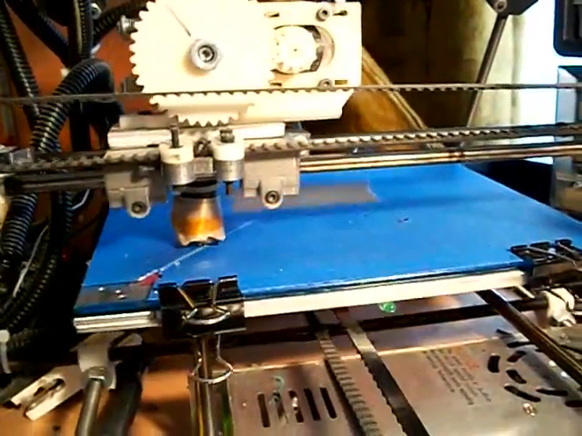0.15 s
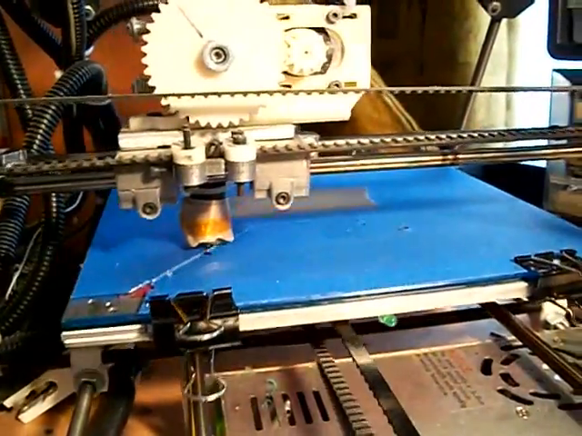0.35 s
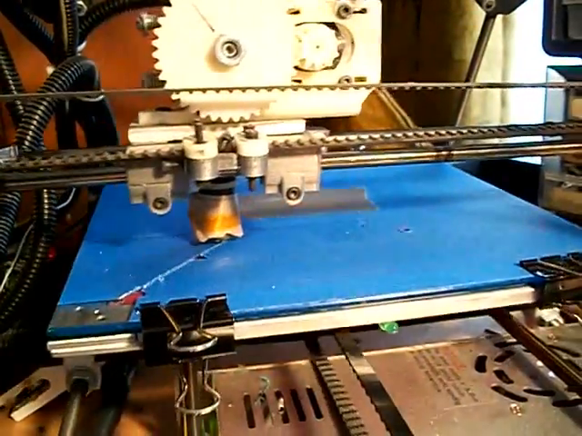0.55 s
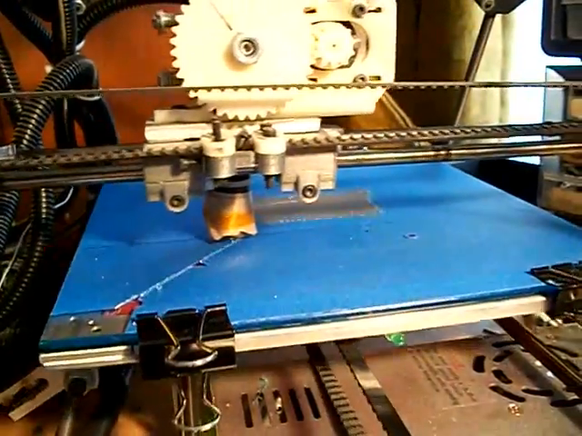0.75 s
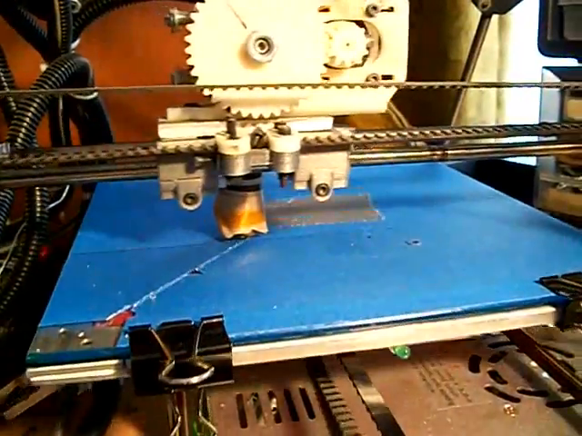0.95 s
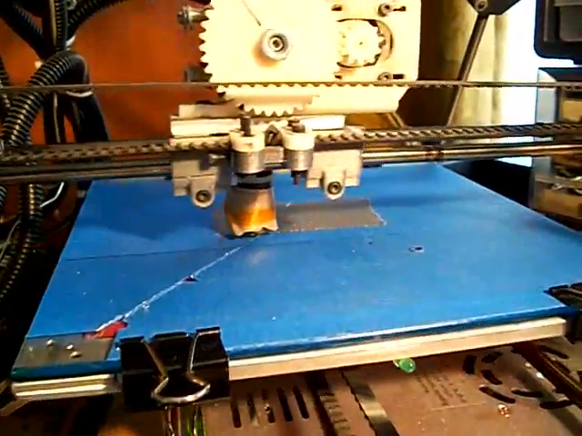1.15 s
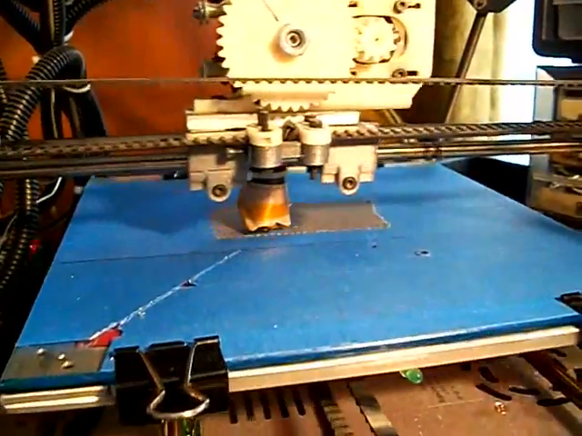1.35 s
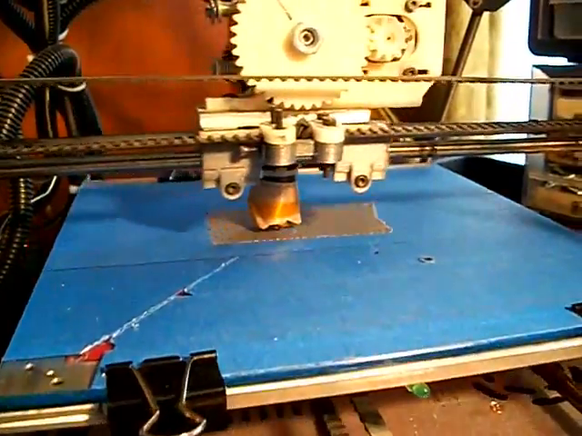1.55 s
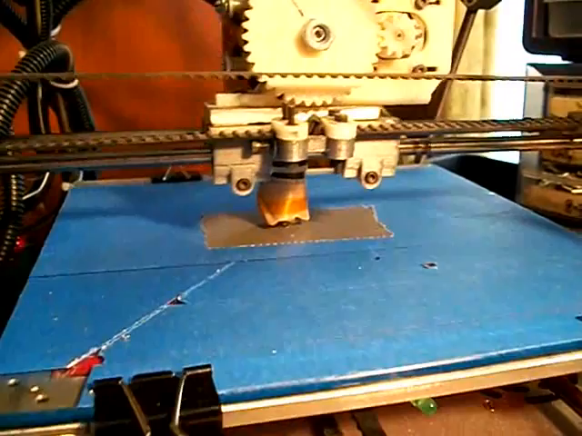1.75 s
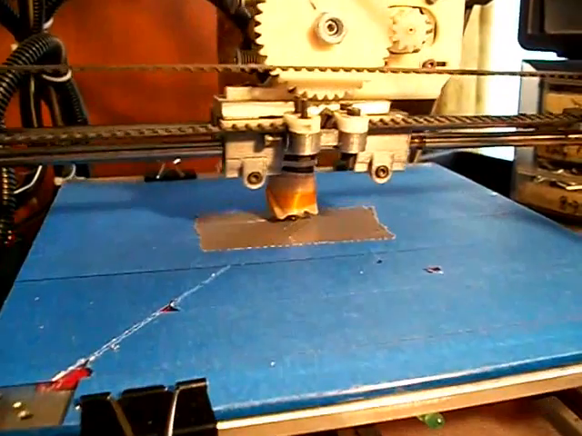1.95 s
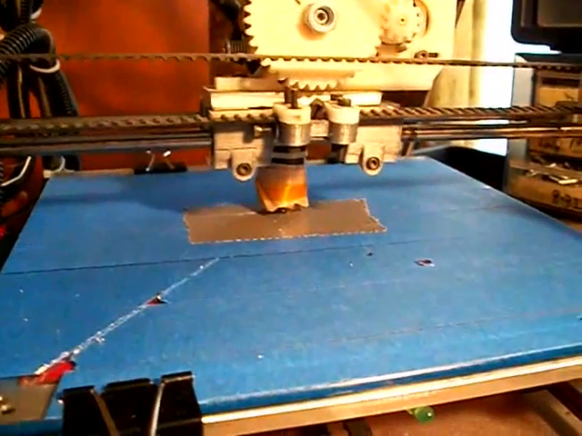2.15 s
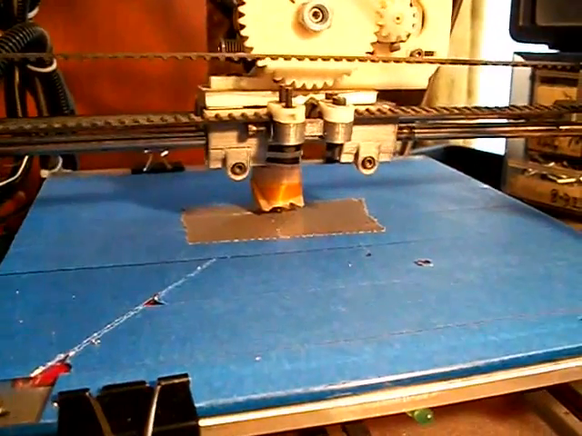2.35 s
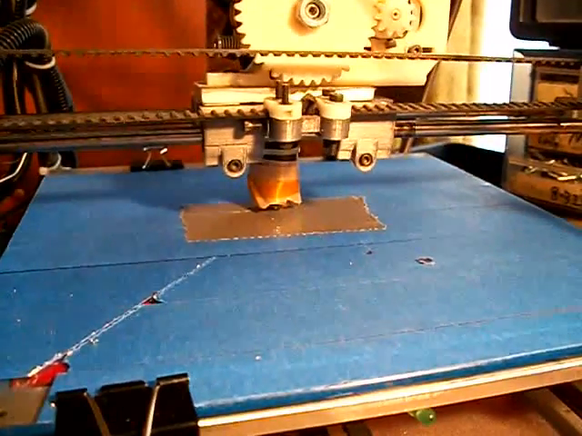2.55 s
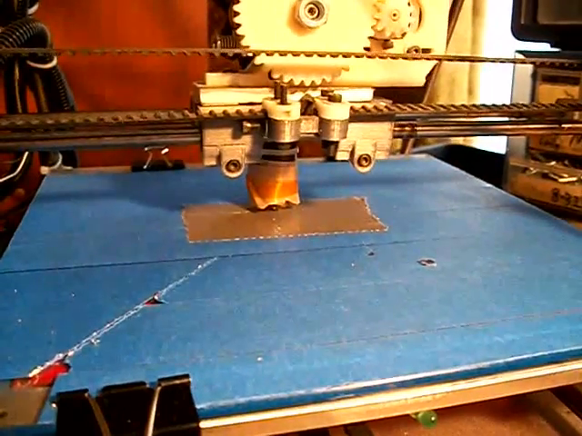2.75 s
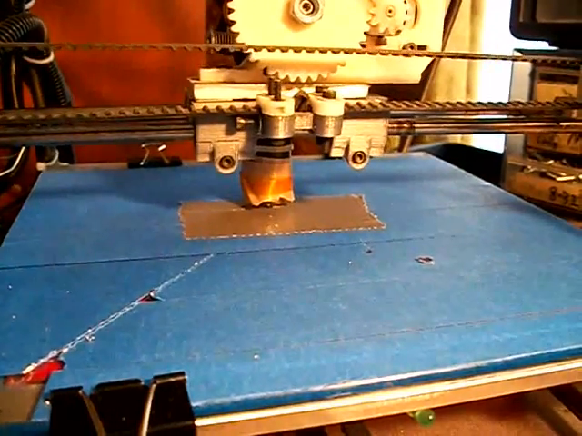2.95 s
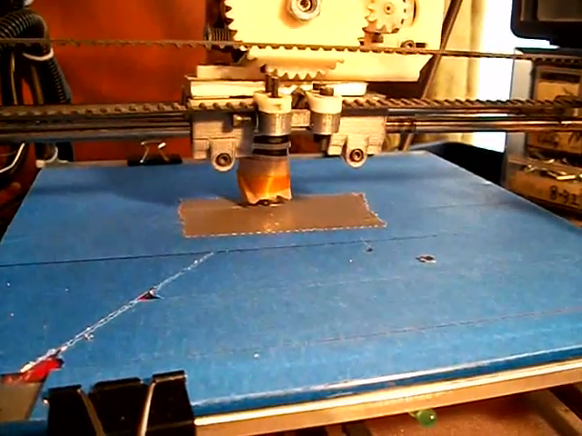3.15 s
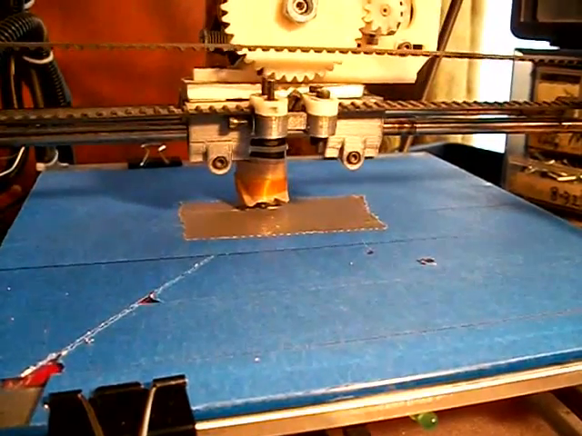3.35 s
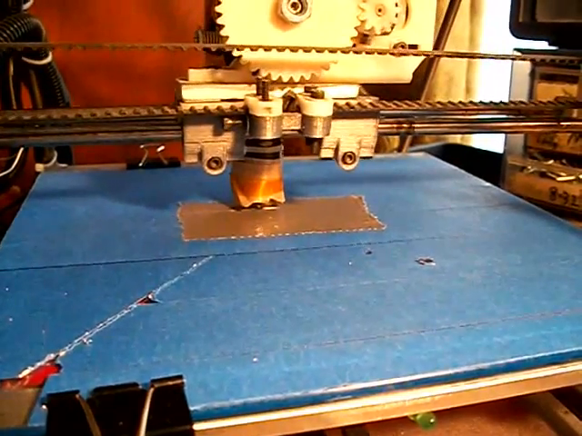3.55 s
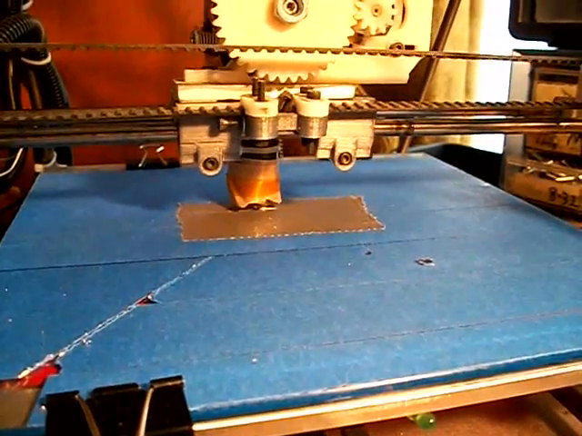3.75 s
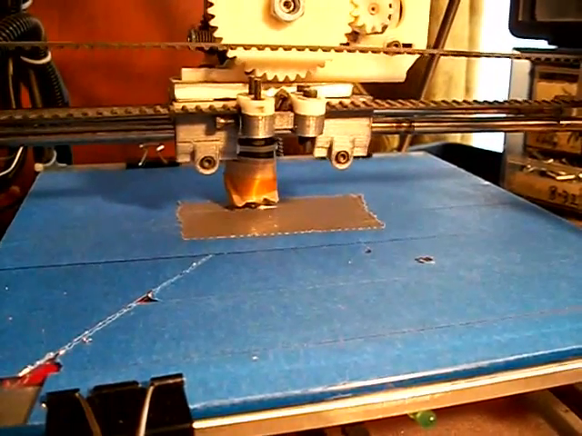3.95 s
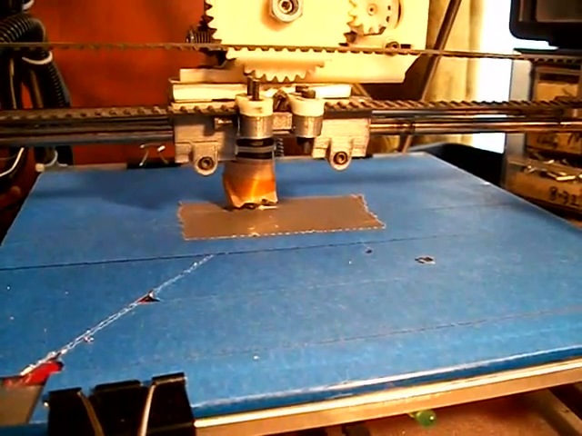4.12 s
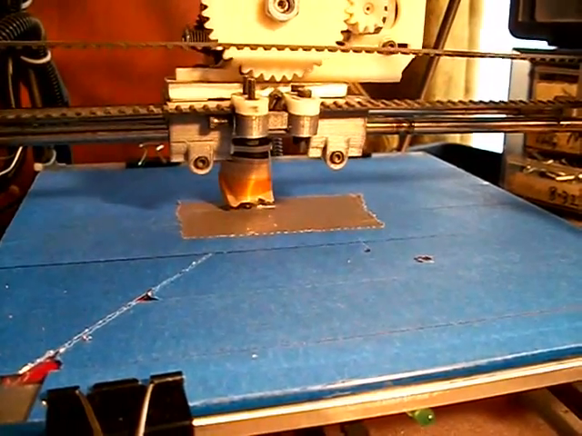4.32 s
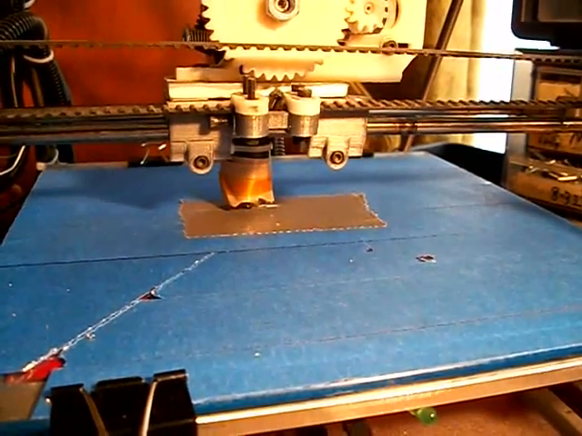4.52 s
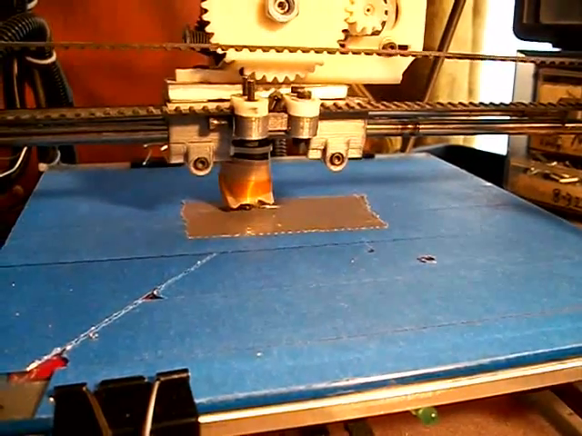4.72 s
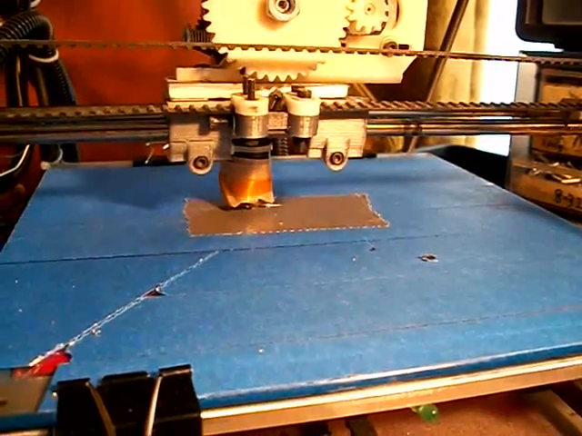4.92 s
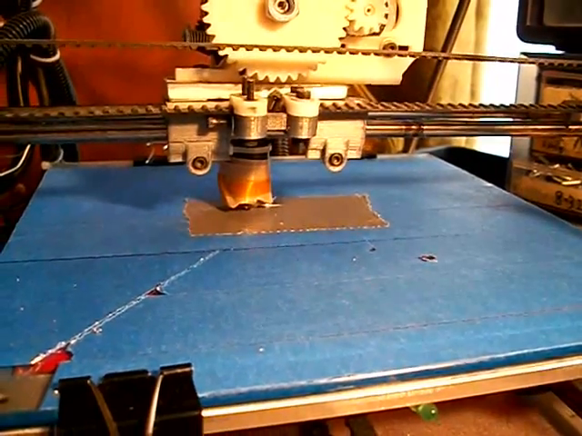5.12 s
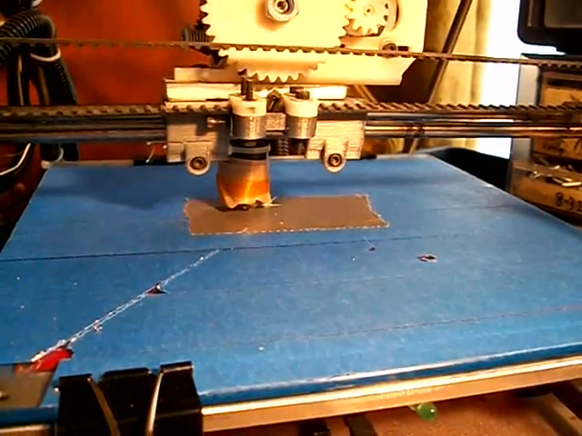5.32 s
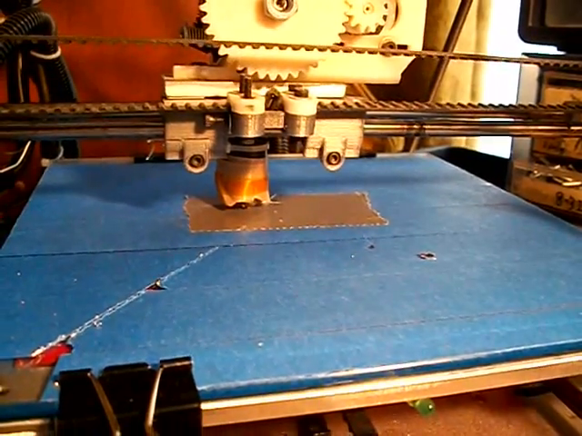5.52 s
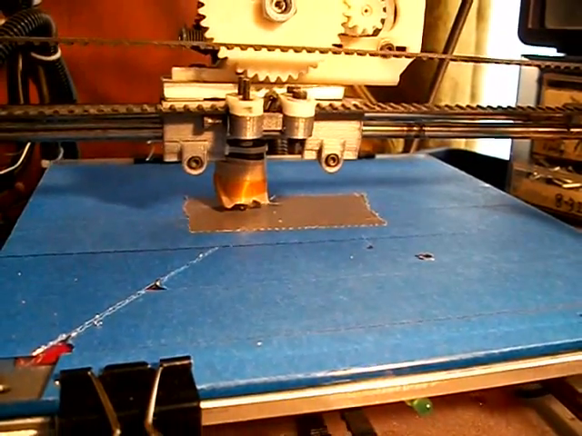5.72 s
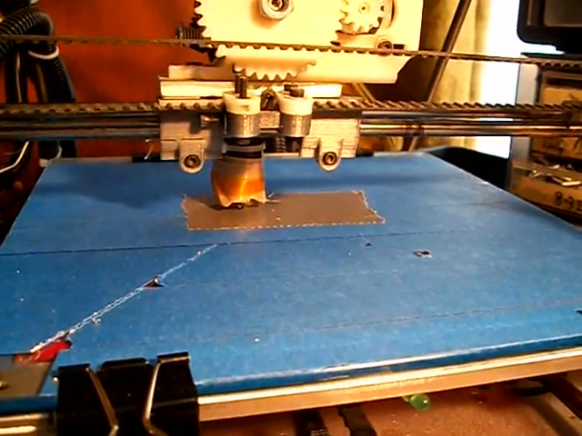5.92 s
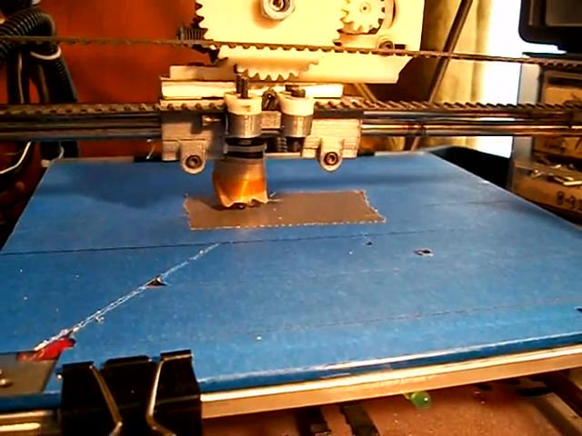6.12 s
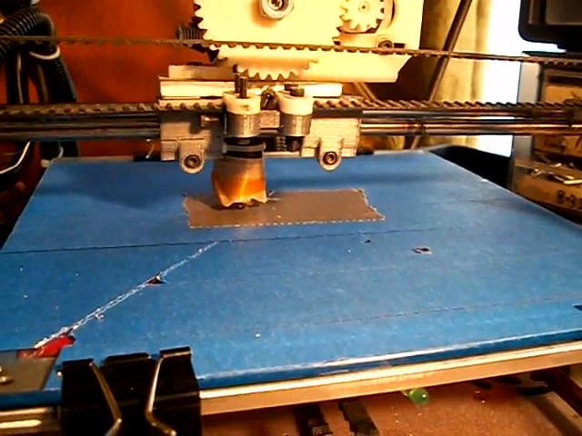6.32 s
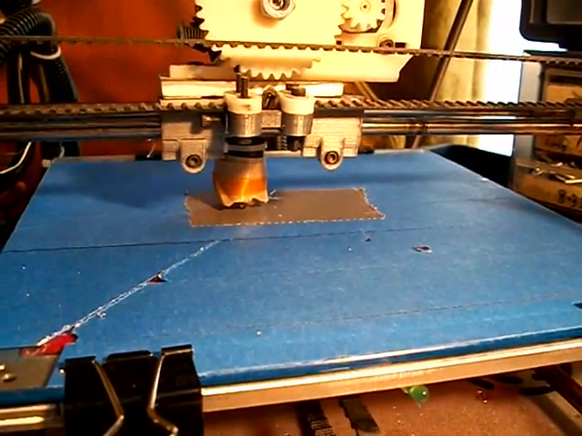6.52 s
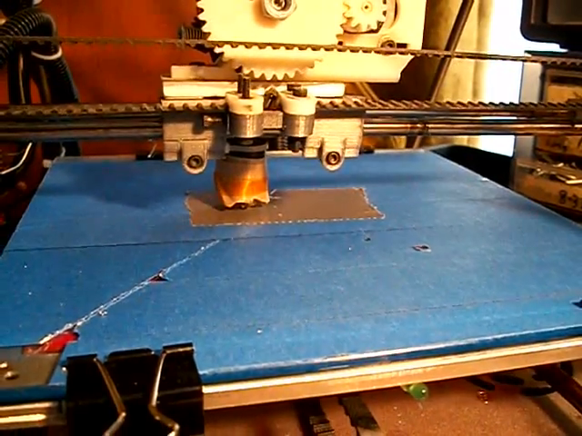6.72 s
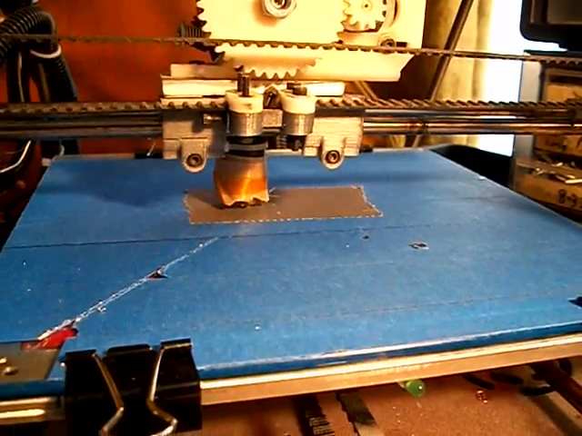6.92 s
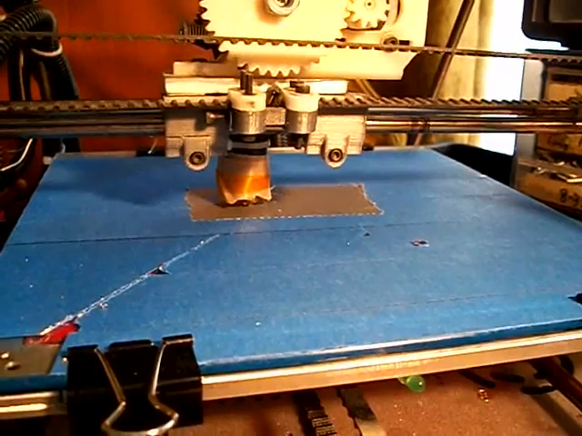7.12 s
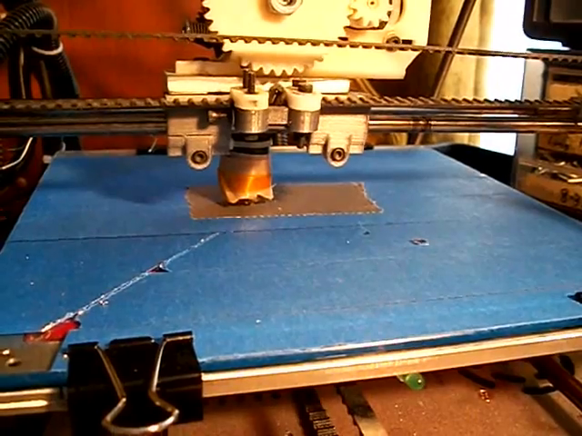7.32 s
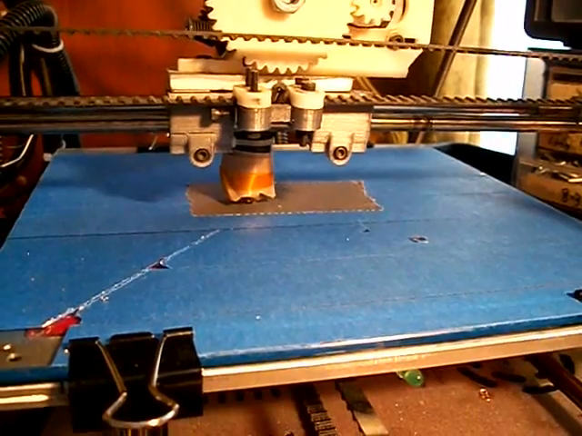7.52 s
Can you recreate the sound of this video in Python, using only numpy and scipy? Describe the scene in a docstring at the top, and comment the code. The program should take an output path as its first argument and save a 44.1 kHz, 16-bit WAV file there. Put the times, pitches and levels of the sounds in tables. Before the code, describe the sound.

Heard up close, a 3D printer makes a fast move with an even motor hum, small metallic ticks and buzzing. It stops for an instant, then the motors pulse and growl at changing speeds. The sound eases around a soft knock and a faint squeak, then builds again with sharp rattles from the loose carriage and short scrapes. A small fan and low room noise lie underneath.

```python
"""A small 3D printer in a quiet room, close up on one microphone.
First a fast straight move: the steppers hum in the frame's two main resonances and loose parts rattle.
At 2.1 s it halts briefly. From 2.3 s it traces an arc of a circle in short straight sides: head and bed
motors kick the frame with uneven microsteps, one slowing as the other speeds up. Along the way come
scrapes, a faint squeak, one knock and the rattling carriage. A small fan runs throughout."""
import sys
import numpy as np
from scipy import signal
from scipy.fft import rfft, irfft
from scipy.io import wavfile
from scipy.ndimage import uniform_filter1d

SR = 44100
rng = np.random.default_rng(int(sys.argv[2]) if len(sys.argv) > 2 else 0)


def unload_wav(signal):
    """Save mono or channel-first audio to the path in sys.argv[1] as 16-bit WAV at rate SR, clipped to [-1, 1]."""
    wavfile.write(
        sys.argv[1],
        SR,
        np.round(np.clip(np.atleast_2d(signal).T, -1, 1) * 32767).astype(np.int16),
    )


N = 338200
T = np.arange(N) / SR
STOP_S, START_S = 2.143, 2.345  # the straight move ends, the arc begins
TRAVEL_HZ, TOP_SPEED = 37.55, 28.3  # steps/s: on the straight move, at most on the arc

# the bed motor's eight microsteps: relative kick
BED_KICKS = [0.81, 0.2, 0.084, 0.067, 0.073, 0.04, 0.13, 0.43]
# spectrum of the dull clatter of loose parts: f/Hz, relative level/dB
CLATTER_COLOUR = [(60, -25.5), (100, 1.5), (140, -9), (280, 5), (450, 3.5), (600, 2.5), (760, 3.5),
                  (850, -8.5), (1130, -17.5), (1350, -30.5), (2000, -62.5)]
# spectrum of their bright rattle: f/Hz, relative level/dB
RATTLE_COLOUR = [(600, -13), (1100, -1), (1500, -7.5), (1800, -3), (2050, -3), (2400, 2.5), (2900, -4.5),
                 (3300, -7), (4000, -10), (4700, -9), (5600, -17), (7400, -26.5), (8300, -41.5),
                 (9200, -59.5)]


def straight_move(low_db=-19, high_db=-17, clatter_db=-37, rattle_db=-38.5):
    """At constant speed, 5 and 10 times the step rate sit on the frame's two main resonances."""
    # how hard the frame shakes: t/s, relative level/dB
    shaking = [(0, -1.5), (.13, 0.5), (.42, -5.5), (.63, -1), (.8, -5), (.95, -1.5), (1.3, -1), (1.53, -7),
               (1.68, -2), (1.87, -9.5), (2.06, -1.5)]
    shake = envelope(shaking)
    steps = TRAVEL_HZ * T
    low_gain = amp(low_db + drift(hz=20.6)) * shake ** 0.72 * ring_out(t60=0.18)
    high_gain = amp(high_db + .5 * drift(hz=17)) * ring_out(t60=0.07)
    low_tone = np.sqrt(2) * np.sin(2 * np.pi * 5 * steps + .3 * drift(hz=4))
    high_tone = np.sqrt(2) * np.sin(2 * np.pi * 10 * steps + .04 * drift(hz=8))
    hum = low_gain * low_tone + high_gain * high_tone
    # loose parts touch a little harder at the crests of the frame's swing
    contact = unit_rms(throb(steps, depth_db=-0.14) * amp(0.36 * low_tone))
    clatter = amp(clatter_db) * coloured(contact * chatter(per_s=3000, spread_db=-1.5), CLATTER_COLOUR)
    rattle = amp(rattle_db) * coloured(contact * chatter(per_s=7000, spread_db=2), RATTLE_COLOUR)
    return hum + (shake ** 0.8 * (overtones(steps) + clatter) + shake * rattle) * ring_out(t60=0.13)


def overtones(steps, waver=0.28):
    """The weaker multiples of the step rate flutter as belts and rods shift."""
    # partials of the hum: multiple of the step rate
    multiples = [4, 6, 7, 8, 11, 12, 13, 14, 15, 16, 17, 18, 19, 20, 22, 23, 24, 25, 28, 30]
    # their strengths: relative level/dB
    strengths = [-40, -49.5, -56.5, -34.5, -45, -39, -43, -44.5, -39.5, -41, -46.5, -40, -46, -44.5, -50,
                 -52, -49.5, -49.5, -51, -53]
    flutter, out = [drift(hz=8.2) for _ in range(7)], np.zeros(N)
    for k, db in zip(multiples, strengths):
        phase = 2 * np.pi * (k * steps + rng.random()) + waver * flutter[k % len(flutter)]
        out += amp(db) * (1 + waver * flutter[(k + 2) % len(flutter)]) * np.sin(phase)
    return np.sqrt(2) * out


def arc():
    """Head and bed move as cosine and sine of the heading; their steps drive hum, rattle and whine."""
    heading, bed_velocity, head_steps, bed_steps = path()
    bed_speed = abs(bed_velocity)
    onset = np.clip((T - START_S) / 0.0058, 0, 1)
    loose = loose_parts(heading, head_steps, bed_steps, bed_speed, onset)
    hum = frame_hum(heading, head_steps, bed_steps, bed_velocity)
    rumble = bed_rumble(bed_steps, bed_speed)
    faster_steps = np.where(bed_speed > TOP_SPEED / np.sqrt(2), bed_steps, head_steps)
    return onset * (hum + rumble) + loose + squeak(head_steps) + whine(faster_steps)


def path():
    """Heading in radians, bed velocity in steps/s, and head and bed positions in steps."""
    # straight sides of the arc: start t/s, head velocity/(steps/s), bed velocity/(steps/s)
    sides = [(2.345, 23.3, -15.55), (2.63, 24.6, -13.55), (2.82, 25.6, -10.8), (3, 26.5, -8.25),
             (3.18, 27.1, -5.7), (3.36, 27.72, 0), (3.95, 27.3, 5.3), (4.12, 26.6, 8), (4.3, 25.8, 10.2),
             (4.46, 24.9, 12.6), (4.6, 24.2, 14.3), (4.72, 23.6, 15.8), (4.98, 20.9, 19),
             (5.15, 18.7, 20.9), (5.41, 15.4, 23.6), (5.64, 12.6, 25.3), (5.87, 10, 26.5),
             (6.05, 7.8, 27.15), (6.23, 4.5, 27.95), (6.5, 0, 28.3), (6.9, -4.5, 27.95), (7.13, -8.2, 27),
             (7.4, -10.8, 26.05), (7.52, -12.6, 25.3)]
    starts, head, bed = np.transpose(sides)
    side = np.maximum(np.searchsorted(starts, T, "right") - 1, 0)
    head, bed, running = head[side], bed[side], T > START_S
    heading = uniform_filter1d(np.arctan2(bed, head), size=1500)
    head_steps = .12 + np.cumsum(head * running) / SR
    bed_steps = .2 + np.cumsum(bed * running) / SR
    return heading, uniform_filter1d(bed, size=600), head_steps, bed_steps


def frame_hum(heading, head_steps, bed_steps, bed_velocity):
    """Both motors ring the frame in three ranges: a low sway, a throbbing ring and a thin top."""
    # the frame's low resonance: t/s, relative level/dB
    sway_levels = [(2.36, -21.5), (2.52, -20), (2.8, -25.5), (3.3, -24.5), (3.65, -26.0), (4.0, -23.5),
                   (4.33, -28.5), (4.88, -22.5), (5.08, -25.5), (5.3, -24.5), (5.92, -26), (6.12, -32),
                   (6.8, -29.5), (7.27, -24.5), (7.62, -30)]
    # its high resonance: t/s, level/dB
    ring_levels = [(2.36, -20), (2.62, -22), (2.8, -26), (3.15, -27), (3.33, -27.5), (3.38, -41.5),
                   (3.93, -43), (3.99, -26.5), (4.4, -28), (4.7, -25), (5, -23), (5.2, -21.5), (5.8, -22),
                   (6, -25), (6.4, -25), (7.1, -26), (7.65, -23.5)]
    bed = bed_motor(bed_steps, bed_velocity)
    head = head_motor(heading, head_steps)
    frame = bed + below(head, hz=290) + amp(-13) * (head - below(head, hz=270))
    sway, body = below(frame, hz=261.7), below(frame, hz=447)
    slowness = np.cos(heading) ** 2  # a fast bed evens out the throb
    ring = (body - sway) * throb(bed_steps, depth_db=4.5) ** slowness
    top = (frame - body) * throb(bed_steps, depth_db=-5.5)
    top_gain = bed_drive(abs(bed_velocity), db=-44.5, hump_db=7.5, creep_db=5.5, worst_speed=19.9)
    hum = amp(-1) * envelope(sway_levels) * steadied(sway, seconds=0.11)
    hum += envelope(ring_levels) * steadied(ring, seconds=0.14)
    return hum + top_gain * steadied(top, seconds=1)


def bed_motor(steps, velocity, lead_s=.008):
    """The bed's microsteps jolt the frame a moment before its swing peaks."""
    # the frame's answer to a jolt: f/Hz, gain/dB
    frame_response = [(50, -32), (100, -13), (130, -30.5), (168, -13.5), (188, 4), (205, -10.5),
                      (225, -9.5), (255, -23), (288, -13.5), (315, -28.5), (348, 1.5), (368, 8), (392, -8),
                      (428, -12), (480, -26.5), (560, -22.5), (615, -26.5), (680, -15), (745, -9),
                      (810, -32.5), (900, -25.5), (1000, -43), (1090, -18), (1280, -51), (2500, -84)]
    return through_body(stepper(steps + lead_s * velocity, BED_KICKS, rough=0.05), frame_response)


def head_motor(heading, steps):
    """The light carriage: much softer when slow, and hardly radiating below its resonances."""
    # the head motor's eight microsteps: relative kick
    head_kicks = [3.26, 1.3, 2, 2.3, 2, 1.64, 0.51, 1.2]
    # resonances they ring: f/Hz, width/Hz, signed gain
    modes = [(111, 40, 0.39), (182.4, 7.4, 0.94), (241, 49, -0.14), (372.3, 31, -0.66), (405, 37, 0.089),
             (563, 9.7, 0.07), (686, 76, 0.022), (1111, 19, -0.089)]
    kicks = signal.sosfilt(butter(4, 900), stepper(steps, head_kicks, rough=0.19))
    ring = sum(gain * resonate(kicks, hz, width) for hz, width, gain in modes)
    head = signal.sosfilt(butter(5, 176, "high"), ring * np.cos(heading) ** 4)
    return head - 0.24 * resonate(head, hz=235, width=40)


def stepper(steps, sizes, rough):
    """Each microstep crossed kicks the frame; the sizes repeat roughly with every full step."""
    micro = np.floor(len(sizes) * steps).astype(int)
    at = np.flatnonzero((np.diff(micro) != 0) & (T[1:] > START_S))
    which = np.maximum(micro[at], micro[at + 1]) % len(sizes)
    kicks = np.zeros(N)
    kicks[at] = np.array(sizes)[which] * (1 + rough * rng.standard_normal(N)[at])
    return kicks


def bed_rumble(steps, speed, boom_hz=101, thud_hz=99, thud_speed=11):
    """A slow bed thuds at each step, a faster one booms, and near top speed it rocks the printer."""
    kicks = stepper(steps, BED_KICKS, rough=0.49)
    thuds = unit_rms(resonate(resonate(kicks, thud_hz, width=32), thud_hz, width=16))
    # the boom swells when four times the step rate meets a low resonance
    push = np.sin(2 * np.pi * 4 * steps) * (T > START_S)
    boom = resonate_twice(push, boom_hz, width=7)
    rocking = (speed / TOP_SPEED) ** 30 * np.sin(2 * np.pi * steps)
    return amp(-47) * bell(speed, thud_speed, spread=3) * thuds + amp(-35) * boom + amp(-46) * rocking


def loose_parts(heading, head_steps, bed_steps, speed, onset, judder_speed=16):
    """On the arc, each step of the bed shakes loose parts into clatter, rattle and knocks."""
    clatter_gain = bed_drive(speed, db=-43.5, hump_db=8, creep_db=18, worst_speed=20.3)
    clatter_gain *= amp(6 / (1 + (speed / judder_speed) ** 6))  # a slow bed judders
    rattle_gain = bed_drive(speed, db=-48, hump_db=5, creep_db=3.5, worst_speed=17.3)
    rattle_gain *= amp(1.4 * np.sin(2 * heading))  # more while the bed speeds up than while it slows
    # hard shaking lifts heavier parts, which knock
    knock_gain = rattle_gain ** 2 / rattle_gain.max() * throb(bed_steps, depth_db=0.5)
    # spectrum of those knocks: f/Hz, relative level/dB
    knock_colour = [(600, -23.5), (900, 7), (1100, -7), (1300, -14), (1500, -9.5), (1780, -1), (2050, -5.5),
                    (2500, -10.5), (3200, -16.5), (5000, -41), (9000, -83)]
    loose = clatter_gain * coloured(chatter(per_s=3800, spread_db=-2.5), CLATTER_COLOUR)
    loose += rattle_gain * coloured(chatter(per_s=7000, spread_db=-1.5), RATTLE_COLOUR)
    loose += knock_gain * coloured(chatter(per_s=2000, spread_db=1.5), knock_colour)
    bed_throb = throb(bed_steps, depth_db=4.4 - 2.2 * np.sin(heading) ** 8)
    shake = steadied(onset * bed_throb * throb(head_steps, depth_db=0.5), seconds=0.73)
    return onset * shake * loose


def bed_drive(speed, db, hump_db, creep_db, worst_speed, creep_speed=4.6):
    """Gain by the bed's speed in steps/s: a hump where it shakes hardest, a drop when it creeps."""
    creeping = 1 / (1 + (speed / creep_speed) ** 10)
    return amp(db + hump_db * bell(speed, worst_speed, spread=5.2) - creep_db * creeping)


def slack_knock(at_s=3.587, db=-17, hz=365, rise_s=0.0049):
    """One soft knock on the frame's high resonance before the bed reverses."""
    age = np.maximum(T - at_s, 0)
    return amp(db) * age / rise_s * np.exp(1 - age / rise_s) * np.sin(2 * np.pi * hz * age)


def carriage_rattles(bounce_s=.0053, strikes=4, bounce_db=-1.5):
    """The loose carriage strikes on a few successive swings of the frame."""
    # its hardest rattles: t/s, peak level/dB
    rattles = [(2.366, -25.5), (2.922, -29.5), (4.172, -28.5), (4.286, -26.5), (4.397, -24.5),
               (4.834, -25.5), (4.958, -22), (5.068, -19), (5.117, -21), (5.312, -22), (5.361, -20),
               (5.413, -24.5), (5.451, -19.5), (5.494, -22), (5.63, -24)]
    # its resonances: f/Hz, width/Hz, relative level/dB
    modes = [(930, 78, -1), (1093, 64, -7), (1470, 110, -6.5), (1810, 70, -4), (2030, 150, -2),
             (2410, 360, -1), (2780, 220, -1)]
    t, out = np.arange(2000) / SR, np.zeros(N)
    for s, peak_db in rattles:
        burst = np.zeros(2 * len(t))
        for k in range(strikes):
            ring = sum(amp(db + 2.3 * rng.standard_normal()) * damped_sine(t, hz, width, rng.random())
                       for hz, width, db in modes)
            add_at(burst, (k + .3 * rng.random()) * bounce_s, amp(bounce_db * abs(k - 1)) * ring)
        add_at(out, s - 1.5 * bounce_s, amp(peak_db) * burst / abs(burst).max())
    return below(out, hz=3970)


def loose_metal(buzz_rise_s=0.004, buzz_fade_db_per_s=198.5):
    """A small metal part ticks against the frame, and in short bouts buzzes once a swing."""
    # its resonances: f/Hz, width/Hz, relative level/dB
    modes = [(2330, 870, -9.5), (3280, 200, 2), (3700, 340, -4.5), (4610, 260, 3), (6950, 740, -12)]
    # its bouts of buzzing: t/s, relative level/dB
    bouts = [(0, -31), (0.127, -51.5), (1.92, -42.5), (2.035, -36.5), (2.062, -57)]
    # its ticks: t/s, peak of the dull knock/dB, peak of the ring/dB
    ticks = [(0.126, -20, -36), (0.263, -34, -33.5), (0.6453, -28, -28.5), (.791, -52, -29.5),
             (1.926, -40, -28), (1.958, -27, -29), (2.0366, -41, -23.5), (2.055, -32, -29),
             (2.161, -29.5, -29), (2.199, -42, -30.5), (2.217, -33, -36), (2.648, -33, -33)]
    t = np.arange(1500) / SR
    echoes = 0.48 * rng.standard_normal(len(t)) * np.exp(-t / 0.0026)  # off nearby parts
    echoes[0] = 1
    ring = np.convolve(echoes, sum(amp(db) * damped_sine(t, hz, width) for hz, width, db in modes))
    knock = np.convolve(echoes, t * damped_sine(t, hz=1950, width=750))
    buzz_gain = np.zeros(N)
    for s, db in bouts:
        age = np.maximum(T - s, 0)
        buzz_gain += np.minimum(age / buzz_rise_s, 1) * amp(db - buzz_fade_db_per_s * age)
    touches = np.diff(np.floor(5 * TRAVEL_HZ * T), prepend=0) * (1 + 0.9 * rng.standard_normal(N))
    metal = amp(2) * buzz_gain * unit_rms(signal.oaconvolve(touches, ring)[:N])
    for s, knock_db, ring_db in ticks:
        add_at(metal, s, amp(knock_db) * knock / abs(knock).max() + amp(ring_db) * ring / abs(ring).max())
    return signal.sosfilt(butter(10, 7700), metal)


def scrapes(spread_s=0.013):
    """Moving parts rub in brief, bright, gritty swells."""
    # the rubs: t/s, level/dB
    rubs = [(2.845, -42), (4.175, -50), (4.555, -41), (4.64, -46), (5.745, -42), (6.01, -43), (6.13, -49),
            (7.09, -45.5), (7.225, -45.5), (7.345, -47.5), (7.44, -41), (7.53, -45), (7.605, -47.5)]
    # their spectrum: f/Hz, relative level/dB
    colour = [(1200, -22), (2000, -5), (2500, 4), (3000, -4), (3500, -0.5), (4000, -7.5), (4700, -3.5),
              (5600, -16), (7400, -23), (8500, -52.5)]
    swell = sum(amp(db) * bell(T, s, spread_s) for s, db in rubs)
    return swell * coloured(chatter(per_s=4100, spread_db=2), colour)


def squeak(head_steps, lag_steps=0.25):
    """Near its top speed the head carriage rubs faintly on its rod, unevenly from step to step."""
    # course of the squeak: t/s, level/dB
    course = [(2.9, -82), (3.24, -53.5), (3.36, -59), (3.47, -48), (3.6, -52), (3.75, -55), (3.85, -68),
              (3.99, -51), (4.3, -84)]
    rub = resonate_twice(rng.standard_normal(N), hz=3680, width=750)
    rub *= throb(head_steps - lag_steps, depth_db=7.5) * amp(2.2 * drift(hz=20))
    return envelope(course) * below(unit_rms(rub), hz=6000)


def whine(steps):
    """A thin, fuzzy ring that pulses with the steps of the faster motor."""
    # its swells: t/s, spread/s, level/dB
    swells = [(3.7, 0.2, -56), (6.199, 0.2, -50)]
    swell = sum(amp(db) * bell(T, s, spread) for s, spread, db in swells)
    ring = resonate_twice(rng.standard_normal(N), hz=1190, width=170)
    return swell * unit_rms(throb(steps, depth_db=4) * ring)


def fan():
    """A small cooling fan holds a few faint, slightly wavering tones."""
    # its tones: f/Hz, level/dB
    tones = [(209.9, -44.5), (694.4, -57.5), (1050, -68), (2374, -74)]
    return sum(amp(db) * np.sqrt(2) * np.sin(2 * np.pi * hz * T + 0.16 * drift(hz=22))
               for hz, db in tones)


def room_tone(db=-40):
    """The air of the room, a steady low rush behind the printer."""
    # its spectrum: f/Hz, relative level/dB
    colour = [(15, -8), (30, -3.5), (70, -3), (130, 1), (300, 4), (700, -8), (980, -13), (1085, -5.5),
              (1200, -19.5), (1350, -23.5), (2500, -22.5), (4600, -24.5), (5800, -35.5), (7500, -37.5),
              (8500, -53.5), (10000, -88.5)]
    return amp(db) * coloured(rng.standard_normal(N), colour)


def amp(db):
    """Decibels to gain."""
    return 10 ** (np.asarray(db) / 20)


def unit_rms(x):
    """Scales to rms 1."""
    return x / np.sqrt(np.mean(x ** 2) + 1e-20)


def envelope(rows):
    """A gain curve through rows of t/s, level/dB."""
    return amp(np.interp(T, *np.transpose(rows)))


def bell(x, centre, spread):
    """A Gaussian hump of height 1."""
    return np.exp(-.5 * ((x - centre) / spread) ** 2)


def ring_out(t60):
    """Full level until the straight move stops, then 60 dB down every t60 seconds."""
    return amp(-60 * np.maximum(T - STOP_S, 0) / t60)


def throb(steps, depth_db):
    """A swell once in every motor step."""
    return amp(depth_db * np.cos(2 * np.pi * steps))


def steadied(x, seconds):
    """Takes out slow changes of level on the arc and keeps the throb."""
    window = signal.windows.hann(int(seconds * SR) | 1)
    power = signal.fftconvolve(x ** 2, window, "same")
    running = signal.fftconvolve(1. * (T > START_S), window, "same")
    return x * np.sqrt((abs(running) + 1e-9) / (abs(power) + 1e-3 * np.mean(power)))


def drift(hz):
    """A slow random wander of rms 1."""
    f = np.fft.rfftfreq(N, 1 / SR)
    return unit_rms(irfft(rfft(rng.standard_normal(N)) * np.exp(-(f / hz) ** 2), N))


def chatter(per_s, spread_db):
    """Many tiny knocks of uneven size and sign."""
    size = amp(spread_db * np.minimum(rng.exponential(1, N), 4))
    return rng.standard_normal(N) * size * (rng.random(N) < per_s / SR)


def gain_at(f, points):
    """Gain at frequencies f from rows of f/Hz, level/dB."""
    hz, db = np.transpose(points)
    return amp(np.interp(np.log(f + 1), np.log(hz), db))


def coloured(x, points):
    """Gives x a spectrum, at rms 1."""
    return unit_rms(irfft(rfft(x) * gain_at(np.fft.rfftfreq(N, 1 / SR), points), N))


def through_body(x, points):
    """Passes x through a body that rings only after each jolt (minimum phase)."""
    f = abs(np.fft.fftfreq(2 ** 15, 1 / SR))
    log_gain = np.log(gain_at(f, points))
    response = np.fft.ifft(np.exp(np.conj(signal.hilbert(log_gain)))).real
    return signal.oaconvolve(x, response[:len(f) // 2])[:N]


def damped_sine(t, hz, width, turns=0):
    """One struck mode dying away."""
    return np.exp(-np.pi * width * t) * np.sin(2 * np.pi * (hz * t + turns))


def resonate(x, hz, width):
    """Drives one damped mode of gain 1."""
    r = np.exp(-np.pi * width / SR)
    return 2 * signal.lfilter([1 - r], [1, -r * np.exp(2j * np.pi * hz / SR)], x + 1e-18).real


def resonate_twice(x, hz, width):
    """Two equal modes in series, for steeper skirts."""
    return resonate(resonate(x, hz, width), hz, width)


def butter(order, hz, kind="low"):
    """Sections of a maximally flat filter."""
    return signal.butter(order, hz, kind, fs=SR, output="sos")


def below(x, hz):
    """The part of x under a frequency."""
    return signal.sosfiltfilt(butter(6, hz), x)


def add_at(track, s, sound):
    """Mixes a sound into a track at s seconds."""
    part = track[round(s * SR):][:len(sound)]
    part += sound[:len(part)]


def scene():
    """Printer and room reach one close microphone, fed to both channels."""
    mix = straight_move() + arc() + slack_knock() + carriage_rattles() + scrapes() + loose_metal()
    mix += fan() + room_tone()
    return np.array([mix, mix])


def record(dry, clock_hz=12000, image_db=-68, edge_hz=12050):
    """A 12 kHz recorder: a faint mirror image, the left channel one clock tick late, a band limit."""
    mirrored = dry * (1 + 2 * amp(image_db) * np.cos(2 * np.pi * clock_hz * T))
    delay = np.exp(-2j * np.pi * np.fft.rfftfreq(N, 1 / SR) / clock_hz)
    pair = np.array([irfft(rfft(mirrored[0]) * delay, N), mirrored[1]])
    band_limit = signal.firwin(511, edge_hz, window=("kaiser", 9), fs=SR)
    return signal.oaconvolve(pair, band_limit[None], "same", axes=1)


dry = scene()
out = record(dry)
unload_wav(out)
```